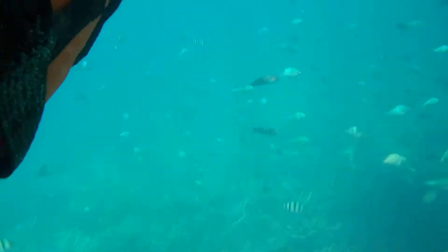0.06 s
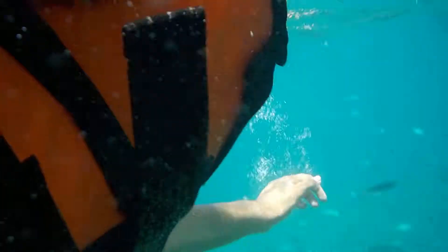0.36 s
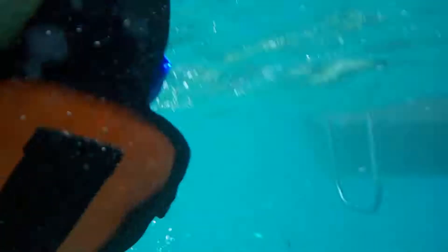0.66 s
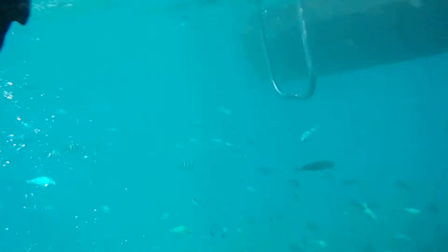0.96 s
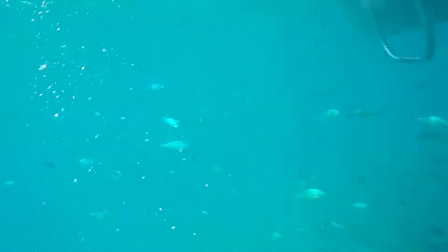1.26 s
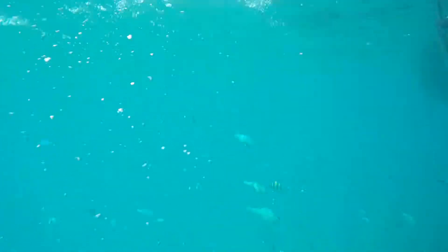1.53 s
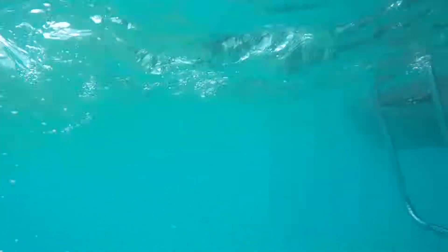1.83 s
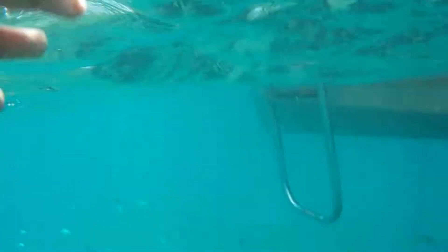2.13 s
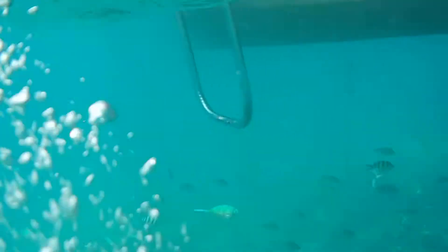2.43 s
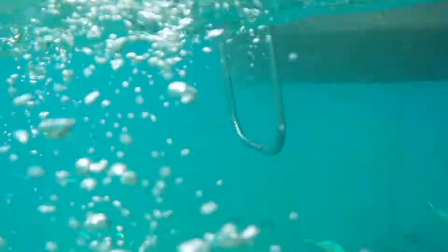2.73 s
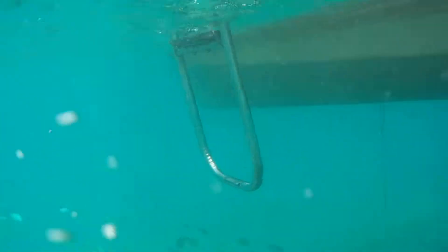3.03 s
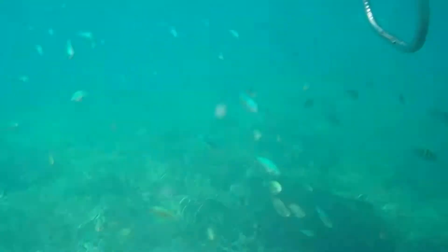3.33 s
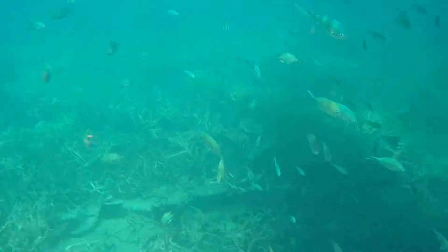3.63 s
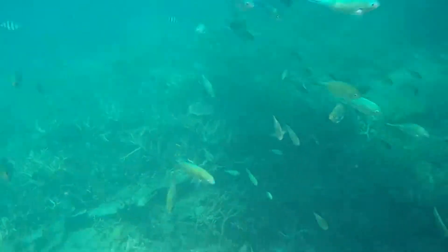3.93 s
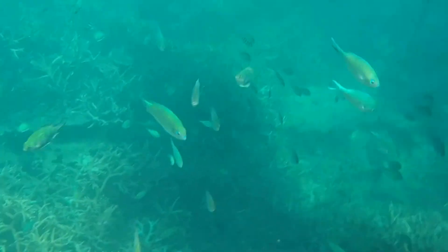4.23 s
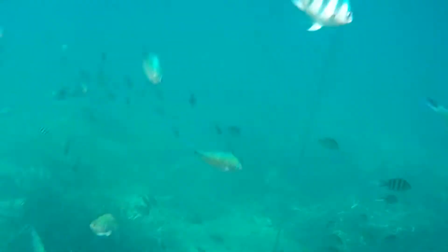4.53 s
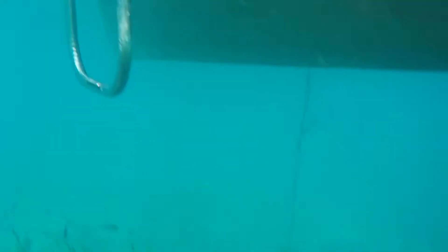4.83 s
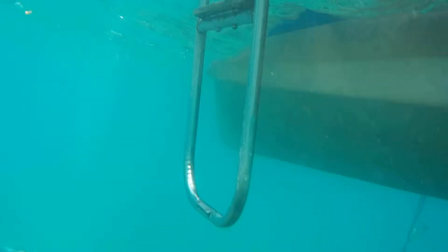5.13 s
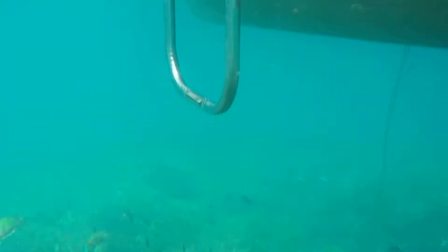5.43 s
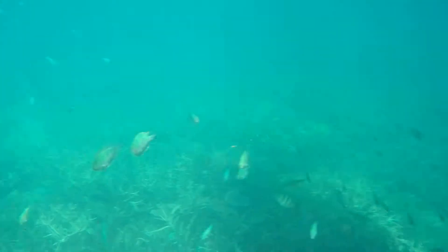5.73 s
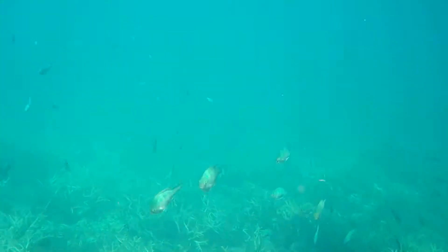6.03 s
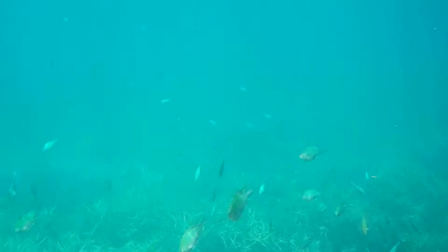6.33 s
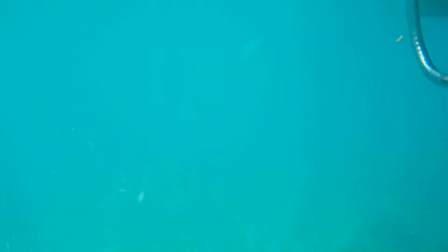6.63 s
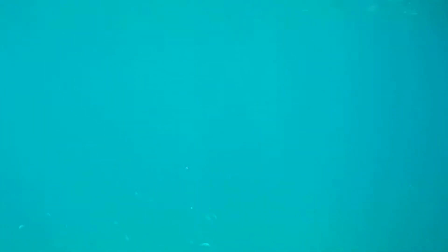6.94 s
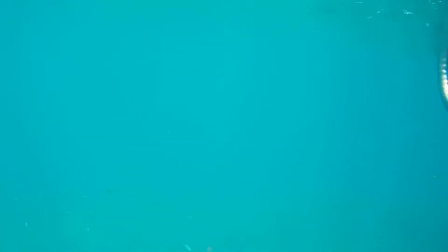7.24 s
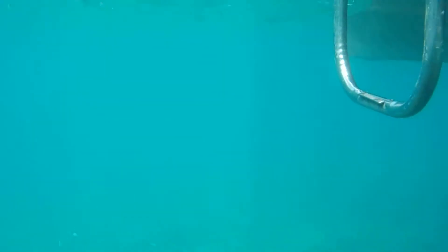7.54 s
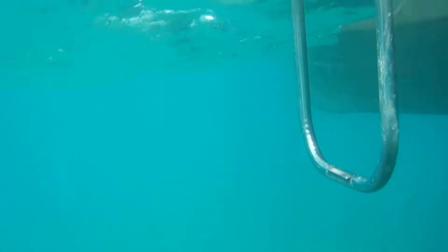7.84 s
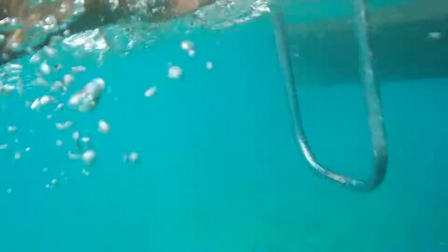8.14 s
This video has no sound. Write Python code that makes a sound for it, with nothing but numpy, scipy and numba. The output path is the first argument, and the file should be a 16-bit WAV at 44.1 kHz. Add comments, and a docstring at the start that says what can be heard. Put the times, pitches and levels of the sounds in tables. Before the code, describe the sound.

Muffled bubbling is heard just under the sea surface, through a stereo microphone in a swimmer's watertight case. In the first second the case knocks, squeaks briefly, creaks and crackles under a hand and life vest, while big bubbles gulp close by. Strokes push soft low rumbles past, and air gurgles and fizzes farther off. Another creak comes at about 1.8 seconds, then a loud burst of bubbles, rising in pitch, around 2.3. After a short lull the grip creaks and crackles again from 3.1 to 3.7. Looser gulps and short strings of plops follow until about 5.3, then things thin out, with knocks and loud plops near 6.2 and 6.5. From 7.5 seconds knocks, crackle and bubbles crowd in, building until the end just after 8. Throughout, tiny collapsing bubbles tick over a very faint hiss.

```python
"""Just under the sea surface near a boat, from a stereo microphone in a swimmer's watertight case.
At first the case knocks, and squeaks and creaks under a hand and a life vest; big bubbles gulp close by.
Strokes rumble past and shed air, which gurgles and fizzes farther off, with a burst at 2.3 s.
The grip crackles again after 3 s, looser gulps follow, and from 7.5 s knocks and bubbles crowd in.
Throughout, tiny collapsing bubbles tick in the water and the wall of the case muffles everything."""
import sys
import numpy as np
from scipy import signal
from scipy.fft import rfft, irfft
from scipy.io import wavfile
from scipy.ndimage import uniform_filter1d
from numba import njit

SR = 44100
rng = np.random.default_rng(int(sys.argv[2]) if len(sys.argv) > 2 else 0)


def wrap_up_sound(samples):
    """Save the sound to the file named by the first command line argument, as 16-bit audio."""
    columns = np.atleast_2d(samples).T
    # keep every value between -1 and 1, then stretch to whole-number steps
    tamed = np.clip(columns, -1, 1)
    steps = np.round(tamed * 32767).astype(np.int16)
    wavfile.write(sys.argv[1], SR, steps)


N = 360738
TIME = np.arange(N) / SR
CUTOFF_HZ = 14200

# air in the water around the swimmer: t/s, big bubbles/dB, middling bubbles/dB, fizz/dB
AIR_LEVELS = [(0.0, -26, -38, -59), (0.34, -38, -45, -59), (0.89, -36.5, -47, -64.5),
              (1.16, -44.5, -49.5, -66), (1.75, -31.5, -42.5, -57), (2.0, -36, -39, -63),
              (2.3, -23.5, -32.5, -52), (2.51, -39, -39, -56.5), (2.71, -46.5, -51.5, -65),
              (3.05, -47.5, -50, -66.5), (3.74, -34, -43, -62.5), (4.6, -33, -43.5, -62.5),
              (4.92, -28.5, -40, -59), (5.74, -42, -48, -62), (6.35, -33, -42.5, -57.5),
              (7.02, -38, -48.5, -66.5), (7.52, -35, -47.5, -62), (8.18, -21, -29, -56)]


def near_plops(pan_db=-0.9, pan_spread_db=3.0):
    """Plops and blips right by the microphone, mostly air that breaks off and rings, singly or in strings."""
    # close ringing plops and short pitched blips, mostly bubbles: t/s, f/Hz, level/dB, t60/s
    plops = [(0.025, 412, -24, 0.13), (0.071, 739, -11.5, 0.043), (0.336, 439, -16, 0.079),
             (0.534, 476, -7.5, 0.026), (0.548, 437, -15, 0.074), (0.595, 414, -7, 0.085),
             (0.636, 523, -16, 0.047), (0.642, 308, -8, 0.031), (0.656, 274.4, -20.5, 0.2),
             (0.708, 465, -13, 0.028), (0.796, 275, -17.5, 0.13), (0.842, 729, -24, 0.13),
             (0.882, 920, -17, 0.02), (0.868, 440, -0.5, 0.01), (0.889, 310, -12, 0.015),
             (1.554, 1740, -32, .041), (1.591, 326.6, -20, 0.065), (1.993, 708, -25, 0.21),
             (2.047, 293, -12, 0.11), (2.066, 496, -17.5, 0.16), (2.091, 337, -15.5, 0.081),
             (2.104, 990, -26, 0.085), (2.301, 376.5, -7, .11), (2.35, 414, 1.5, 0.037),
             (2.355, 1090, -8, 0.012), (2.367, 423, -12.5, .055), (2.546, 1105, -25.5, 0.069),
             (3.098, 1410, -23.5, 0.053), (3.4, 1712, -33.5, 0.038), (3.585, 316.8, -15, 0.47),
             (3.66, 895, -16.5, 0.047), (3.663, 304.7, -13.5, 0.24), (4.004, 358, -21.5, 0.079),
             (4.344, 313, -14.5, 0.13), (4.362, 834, -22, 0.031), (4.463, 320, -17.5, 0.076),
             (4.584, 308, -19, 0.13), (4.652, 332, -14.5, 0.054), (4.751, 458, -9.5, 0.1),
             (4.869, 462, -14, 0.11), (4.894, 313, -14, 0.069), (4.973, 301, -26, 0.49),
             (5.021, 321.4, -8.5, 0.13), (5.103, 298, -28.5, 0.32), (5.176, 895, -19.5, 0.05),
             (5.204, 593, -12.5, 0.026), (5.211, 367, -17.5, 0.06), (5.335, 940, -27, 0.031),
             (5.53, 920, -31, 0.035), (5.837, 984, -30.5, 0.07), (6.111, 721, -24.5, .14),
             (6.249, 299, -6.5, 0.051), (6.449, 307, -0.5, 0.032), (6.459, 810, -7, 0.013),
             (6.471, 291, -7.5, 0.1), (6.698, 890, -25, 0.047), (6.701, 326, -18.5, 0.064),
             (6.94, 840, -21.5, 0.03), (7.208, 1495, -29.5, 0.024), (7.551, 324, -11.5, 0.083),
             (7.617, 926, -20.5, 0.036), (7.644, 305, -9.5, 0.13), (7.675, 207.6, -22, 0.41),
             (7.68, 296.6, -18.5, 0.26), (7.922, 290, -13.5, 0.21), (7.773, 656, -16.5, 0.028),
             (7.78, 337, 0, 0.015), (7.918, 610, -7, .02), (7.995, 354, -9, 0.043),
             (7.965, 308, -0.5, 0.049), (8.011, 388, -4, 0.06), (8.081, 319, -3, 0.033),
             (8.11, 407, -18, 0.044), (8.153, 1560, -21, .039), (8.165, 460, -3, 0.019)]
    s, hz, level_db, t60 = np.transpose(plops + bubble_strings())
    side, lead = rng.standard_normal((len(s), 2)).T
    gains = from_db(level_db + 1.0) * panned(pan_db + pan_spread_db * side)
    return pulsate(s, hz, gains, t60, skew=0.1 * np.sign(lead), rise=0.063, swell_cycles=1.0)


def bubble_strings(per_s=27, t60=0.16, uneven_db=0.5):
    """Air pinches off evenly in ever smaller, higher bubbles; rows of t/s, f/Hz, level/dB, t60/s."""
    # strings of bubbles: first t/s, last t/s, first f/Hz, last f/Hz, first level/dB, last level/dB
    strings = [(2.197, 2.39, 283.8, 422.7, -12.5, -12.5), (3.943, 4.041, 341, 374, -19, -19),
               (4.214, 4.266, 377, 418, -22.5, -21), (7.716, 7.844, 319.5, 442, -20.5, -28.5)]
    rows = []
    for first_s, last_s, first_hz, last_hz, first_db, last_db in strings:
        count = 1 + round((last_s - first_s) * per_s)
        s = np.linspace(first_s, last_s, count)
        hz = np.geomspace(first_hz, last_hz, count)
        level_db = np.linspace(first_db, last_db, count) + uneven_db * rng.standard_normal(count)
        rows += zip(s, hz, level_db, [t60] * count)
    return rows


def stray_bubbles(uneven_db=6.5, pan_spread_db=1.5):
    """Now and then a bubble plops nearer than the crowd, louder where the water holds more air."""
    # size classes: lowest f/Hz, highest f/Hz, rate/(1/s), level over the middling bubbles/dB, t60/s
    strays = [(275, 360, 3, 5.5, 0.14), (630, 1150, 6.1, 13, 0.062), (1438, 1900, 4, 4.5, 0.067)]
    air_s, _, middling_db, _ = np.transpose(AIR_LEVELS)
    out = np.zeros((2, N))
    for low_hz, high_hz, per_s, over_db, t60 in strays:
        s = np.cumsum(rng.gamma(2, 1 / (2 * per_s), size=100))
        place, size, side, skew = rng.uniform(-1, 1, (len(s), 4)).T
        hz = low_hz * (high_hz / low_hz) ** ((place + 1) / 2)
        level_db = np.interp(s, air_s, middling_db) + over_db + uneven_db * size
        gains = from_db(level_db) * panned(pan_spread_db * side)
        out += pulsate(s, hz, gains, np.full(len(s), t60), 0.31 * skew, rise=0.06, swell_cycles=5.4)
    return out


def gurgle(puff_db=2.5, puff_hz=9, small_follows=0.38):
    """Farther off, clouds of bubbles from gulps down to fizz swell with the air in the water."""
    # tiny bubbles drifting past: t/s, length/s, small-bubble lift/dB, fizz lift/dB (none if negative)
    flurries = [(1.24, 0.031, 6, 4), (1.375, 0.087, 9.5, 6), (2.223, 0.27, 3, 3), (2.511, .2, 5, 3.5),
                (3.67, 0.18, 8.5, 6.5), (5.76, 0.3, 6.5, 3.5), (6.376, 0.075, 4.5, 2.5),
                (6.56, 0.25, 7.5, -3.5), (7.458, 0.057, 10.5, 10), (7.85, 0.071, 10.5, 5.5),
                (8.156, 0.058, 11, -5)]
    # spectrum of the big bubbles: f/Hz, level/dB
    big_spectrum = [(200, -18), (260, -8.5), (305, 2), (360, -3), (470, -0.5), (560, -7.5), (700, -24.5)]
    # spectrum of the middling bubbles: f/Hz, level/dB
    middling_spectrum = [(450, -19), (600, -5.5), (700, 1.5), (900, 1), (1100, -2.5), (1300, -9),
                         (1800, -23.5)]
    air_s, *columns = np.transpose(AIR_LEVELS)
    air_db = np.array([np.interp(TIME, air_s, db) for db in columns])
    big_db, middling_db, fizz_db = air_db + puff_db * drift(puff_hz)[0]
    starts, lengths, *lifts_db = np.transpose(flurries)
    small_lift, fizz_lift = [swells(starts, lengths, db, rest_db=0, rise_db_per_s=199, fall_db_per_s=132)
                             for db in lifts_db]
    # small bubbles follow their neighbours in size
    small_db = small_follows * middling_db + (1 - small_follows) * fizz_db + small_lift
    big = cloud(253.3, 550.7, count=1800, cycles=18.7, spread_db=4.5, width=0.3, rise=0.069)
    middling = cloud(560, 1300, count=5000, cycles=33.3, spread_db=4.5, width=0.4, rise=0.055)
    small = cloud(1300, 2083, count=4000, cycles=31, spread_db=4.5, width=1.0, rise=0.035)
    fizz = cloud(2600, 6200, count=22000, cycles=35, spread_db=8.5, width=1.64, rise=0.033)
    finest = cloud(7670, 8560, count=9000, cycles=140, spread_db=8.5, width=0.73, rise=0.03)
    return (from_db(big_db - 1.0) * rms_one(coloured(big, big_spectrum))
            + from_db(middling_db - 0.55) * rms_one(coloured(middling, middling_spectrum))
            + from_db(small_db - 2.0) * small
            + from_db(fizz_db + fizz_lift + 1.5) * (fizz + from_db(-4.0) * finest))


def cloud(low_hz, high_hz, count, cycles, spread_db, width, rise):
    """Bubbles of random size born at random moments; the crowd keeps a steady rms of 1."""
    when, place = rng.random((count, 2)).T
    size, life, side, skew = np.clip(rng.standard_normal((count, 4)).T, -2.2, 2.2)
    hz = low_hz * (high_hz / low_hz) ** place
    gains = from_db(spread_db * size) * panned(4 * width * side)
    t60 = cycles / hz * np.exp(0.8 * life)
    crowd = pulsate(when * N / SR, hz, gains, t60, width * skew, rise, swell_cycles=0.15)
    power = uniform_filter1d(np.mean(crowd ** 2, axis=0), size=5000)
    return crowd / np.sqrt(power + 1e-9)


@njit
def pulsate(s, hz, gains, t60, skew, rise, swell_cycles):
    """Each bubble or blip swells, rings and dies as its pitch climbs by the fraction `rise`."""
    out = np.zeros((2, N))
    for k in range(len(s)):
        start, length = max(int(s[k] * SR), 0), int(t60[k] * SR) + 1
        w = 2 * np.pi * hz[k] / SR
        step = np.exp(-6.9 / length + 1j * w * (1 - rise / 7))
        climb = np.exp(1j * w * rise / length)
        turn = np.exp(1j * skew[k])  # phase between left and right
        opening = np.exp(-hz[k] / (swell_cycles * SR))
        wave, closed = 1 + 0j, 1.
        for i in range(start, min(start + length, N)):
            out[0, i] += gains[0, k] * (1 - closed) * wave.imag
            out[1, i] += gains[1, k] * (1 - closed) * (wave * turn).imag
            wave *= step
            step *= climb
            closed *= opening
    return out


def knocks(uneven_db=4.5, rebound_s=0.002742, rebound_db=-6.5, soft_hz=2300):
    """Each knock or jerk rings the case and catches once more; hard ones favour the high modes."""
    # short knocks and clicks on the case, many of them sounding with loud bubbles:
    # t/s, level/dB, left-right/dB, brightness/(dB per decade)
    case_knocks = [(0.2101, -18, -4, 36), (0.2404, -12, 4, 27), (0.3546, -19.5, 8.5, 18),
                   (0.4498, -22, -22, -12), (0.5336, -12.5, -4.5, 14), (0.638, -12.5, -1, -2),
                   (0.6604, -16.5, 2, 1), (0.8887, -19.5, 3, -22), (3.3535, -21.5, -2, 1),
                   (3.4208, -37, 22, -2), (3.5117, -22, 13, -15), (3.664, -16.5, -10, -18.5),
                   (4.8666, -26, -11.5, -3), (4.9013, -24, -4, -12), (6.249, -14.5, -2, -1),
                   (6.4597, -22, -5, -13), (7.4004, -31.5, -31, -26), (7.5549, -16, 0.5, -8),
                   (7.6473, -12.5, 3, -8), (7.6726, -17.5, 0.5, -20), (7.922, -13, 9, -8),
                   (7.9673, -15.5, 5, -13)]
    # modes of the case around the microphone: f/Hz, level/dB, t60/s
    case_modes = [(305.5, -2, 0.05), (396, -16.5, 0.087), (537, -4, 0.028), (661, -15, 0.032),
                  (913, -6.5, 0.03), (1170, -14, 0.01), (1353, -11, 0.0067), (1572, -15.5, 0.033),
                  (3790, -22, 0.014), (4550, -22, 0.023), (10300, -21.5, 0.0015)]
    s, level_db, pan_db, bright_db = np.transpose(case_knocks + creak_jerks())
    chance = rng.standard_normal((len(s), len(case_modes))).T
    out = np.zeros((2, N))
    for k, (hz, mode_db, t60) in enumerate(case_modes):
        strength_db = level_db + 0.5 + mode_db + bright_db * np.log10(hz / 900) + uneven_db * chance[k]
        clicks = np.zeros((2, N))
        clicks[:, (s * SR).astype(int)] = from_db(strength_db) * panned(pan_db)
        clicks += from_db(rebound_db) * np.roll(clicks, int(rebound_s * SR), axis=1)
        clicks[k % 2] = np.roll(clicks[k % 2], 5)  # modes reach the two microphone ports out of step
        out += ring(clicks, hz, t60)
    cushion = signal.butter(2, soft_hz, fs=SR, output="sos")  # soft contact dulls the treble
    return high_passed(signal.sosfilt(cushion, out), 360, order=2)


def creak_jerks(jitter_s=0.00032, uneven_db=0.2, pan_spread_db=17.5):
    """A creak sticks and slips at a nearly even rate; rows like case_knocks in knocks()."""
    # creaks: first t/s, last t/s, jerk rate/(1/s), level/dB, left-right/dB, brightness/(dB per decade)
    creaks = [(0.5946, 0.6061, 150, -9, 6, 9.5), (0.6917, 0.7084, 106, -18, 8, -6),
              (0.9361, 0.9597, 130, -9, -13, 8), (0.967, 0.9905, 84, -19, -14, -3.5),
              (1.0096, 1.0835, 101, -13, -10.5, 4), (1.758, 1.8027, 107, -12.5, -10, 7.5),
              (1.8172, 1.8829, 88, -13.5, -15, 3), (3.1005, 3.1184, 172, -14, 13.5, -2),
              (3.2401, 3.2808, 109, -19.5, -19, -5)]
    rows = []
    for first_s, last_s, per_s, level_db, pan_db, bright_db in creaks:
        count = 1 + round((last_s - first_s) * per_s)
        late, weak, side = rng.standard_normal((count, 3)).T
        s = np.linspace(first_s, last_s, count) + jitter_s * late
        rows += zip(s, level_db - uneven_db * weak, pan_db + pan_spread_db * side, [bright_db] * count)
    return rows


def squeaks(db_per_octave=-6.0, rasp=0.049):
    """Wet skin slips on the case fast enough to make a short gliding tone with raspy overtones."""
    # fast slips: t/s, length/s, start f/Hz, end f/Hz, level/dB, left-right/dB
    slips = [(0.206, 0.036, 387.3, 407, -16.5, -7), (.240, 0.028, 660, 678, -22.5, 2.5),
             (0.254, 0.022, 768, 1490, -28.5, -7), (0.419, 0.019, 1940, 1000, -31, 9)]
    out = np.zeros((2, N))
    waver = 1 + rasp * drift(600)[0]
    for s, length, start_hz, end_hz, level_db, pan_db in slips:
        start, size = int(s * SR), int(length * SR)
        hz = np.geomspace(start_hz, end_hz, size) * waver[start:start + size]
        phase = 2 * np.pi * np.cumsum(hz) / SR
        tone = sum(from_db(db_per_octave * np.log2(k)) * np.sin(k * phase)
                   for k in range(1, 32) if k * end_hz < CUTOFF_HZ)
        tone *= signal.windows.tukey(size, 0.2)
        out[:, start:start + size] += np.outer(from_db(level_db) * panned(pan_db), tone)
    return coloured(out, [(1700, 3.5), (3200, -7.5), (6500, -13.5), (10000, -24)])


def crackle(mean_gap_s=0.0035, uneven_db=8.5):
    """The grip creeps over the case in tiny slips, each a dry click right at the microphone."""
    # shifts of the grip: start t/s, end t/s, level/dB
    grips = [(0.439, 0.573, -16.5), (0.595, .70, -15), (0.694, 0.815, -25.5), (0.903, 1.084, -21.5),
             (1.729, 1.9, -21), (3.103, 3.134, -16.5), (3.227, 3.699, -21.5), (6.446, 6.488, -16.5),
             (7.243, 7.423, -29), (7.623, 7.693, -19), (7.918, 8.143, -18)]
    # spectrum of one slip: f/Hz, level/dB
    slip_spectrum = [(100, -2.5), (600, 16), (2000, -9.5), (4000, -19.5), (7000, -19.5), (12000, -21.5)]
    s = np.cumsum(rng.gamma(4, mean_gap_s / 4, 4000))
    signs = rng.choice([-1, 1], (2, len(s)))
    sizes = signs * from_db(uneven_db * np.minimum(rng.standard_normal(len(s)), 1.6))
    clicks = np.zeros((2, N))
    for start, end, level_db in grips:
        slipping = (s > start) & (s < end)
        clicks[:, (s[slipping] * SR).astype(int)] = from_db(level_db) * sizes[:, slipping]
    return coloured(clicks, slip_spectrum)


def flow(lumpy_db=4.0, lump_hz=35, shared=0.85):
    """With each stroke eddies press in lumps on the two microphone ports, only partly alike."""
    # water sweeping over the case: t/s, length/s, level/dB
    sweeps = [(0.0, .04, -49), (0.441, .08, -39), (0.6, .35, -45.5), (1.158, .28, -45), (1.647, .02, -56),
              (1.992, 0.085, -41), (2.864, .05, -44), (3.094, .03, -49.5), (3.256, 0.32, -42),
              (3.6, 0.12, -56), (4.14, .4, -55), (4.625, 0.019, -47), (4.865, 0.028, -40),
              (5.458, .02, -61), (6.24, .02, -69), (6.46, .2, -57), (7.246, .15, -45), (7.554, .12, -71),
              (7.87, .04, -45.5), (8.064, 0.032, -40.5)]
    # spectrum of the eddies: f/Hz, level/dB
    rumble_spectrum = [(15, -32), (35, -13.5), (60, -7.5), (120, -1.5), (190, 2), (300, 4.5), (600, -26),
                       (1500, -58)]
    flow_db = swells(*np.transpose(sweeps), rest_db=-69, rise_db_per_s=258.5, fall_db_per_s=103)
    eddies = rng.standard_normal((2, N)) + shared * rng.standard_normal(N)
    eddies *= from_db(lumpy_db * drift(lump_hz))
    return from_db(flow_db + 7.0) * rms_one(coloured(eddies, rumble_spectrum))


def ticks(t60=0.004, echo_s=0.0012, echo_db=-3.5):
    """Tiny collapses: a dry snap of a few cycles, smeared by echoes off the surface and the swimmer."""
    # the sharpest collapses: t/s, level/dB, f/Hz
    snaps = [(0.2003, -33, 3830), (0.4468, -29, 3780), (0.5325, -37.5, 5700), (1.586, -44.5, 4100),
             (1.9612, -45, 5830), (2.0738, -42, 3960), (2.2763, -37, 5740), (3.1068, -40.5, 3500),
             (3.6074, -41.5, 3040), (3.8388, -39, 3270), (4.2046, -41, 5000), (4.376, -46, 3860),
             (4.411, -41.5, 4460), (4.7605, -44, 3950), (5.078, -40.5, 3280), (5.528, -46, 4170),
             (5.879, -41.5, 4570), (5.9986, -41, 5300), (6.29, -42.5, 4430), (6.3696, -42, 4300),
             (6.4348, -43, 3870), (6.9, -41, 4500), (7.2494, -45, 5540), (7.521, -42, 4460)]
    s, level_db, hz = np.transpose(snaps + faint_ticks())
    gains = from_db(level_db + 11.5) * panned(4 * rng.standard_normal(len(s)))
    out = np.zeros((2, N))
    for k in range(4):  # the direct path, then three echoes
        late, skew, detune = rng.standard_normal((len(s), 3)).T
        arrival = s + k * echo_s * np.exp(0.23 * late)
        out += pulsate(arrival, hz * np.exp(0.14 * detune), gains * from_db(k * echo_db),
                       np.full(len(s), t60), 0.84 * skew, rise=0., swell_cycles=0.083)
    return out


def faint_ticks(count=12, uneven_db=2.0, centre_hz=4200, pitch_spread=0.25):
    """Fainter collapses at random moments, their level following the fizz; rows of t/s, level/dB, f/Hz."""
    when, size, place = rng.uniform(-1, 1, (count, 3)).T
    s = TIME[-1] * (when + 1) / 2
    air_s, _, _, fizz_db = np.transpose(AIR_LEVELS)
    level_db = np.interp(s, air_s, fizz_db) + 16 + uneven_db * size
    return list(zip(s, level_db, centre_hz * np.exp(pitch_spread * place)))


def hiss():
    """A faint, steady, bright hiss lies behind everything."""
    # spectrum of the hiss: f/Hz, level/dB
    hiss_spectrum = [(500, -5.5), (3000, -7), (6000, -7.5), (9000, 10), (13000, 15)]
    return from_db(-65.5) * rms_one(coloured(rng.standard_normal((2, N)), hiss_spectrum))


def swells(starts, lengths, tops_db, rest_db, rise_db_per_s, fall_db_per_s):
    """Level curve in dB: each event climbs from rest, holds and sinks back."""
    curve = np.full(N, float(rest_db))
    for start, length, top_db in zip(starts, lengths, tops_db):
        before, after = np.maximum(start - TIME, 0), np.maximum(TIME - start - length, 0)
        curve = np.maximum(curve, top_db - rise_db_per_s * before - fall_db_per_s * after)
    return curve


def drift(hz, hop=40):
    """Smooth random wander of rms 1, mostly slower than `hz`, separate in each channel."""
    r = np.exp(-2 * np.pi * hz * hop / SR)
    noise = rng.standard_normal((2, N // hop + 2002))
    slow = signal.lfilter([1], [1, -2 * r, r * r], noise)[:, 2000:]
    return np.array([np.interp(np.arange(N) / hop, np.arange(len(s)), rms_one(s)) for s in slow])


def ring(clicks, hz, t60):
    """A unit click sets a sine of height 1 ringing."""
    r, w = from_db(-60 / (t60 * SR)), 2 * np.pi * hz / SR
    return signal.lfilter([0, np.sin(w)], [1, -2 * r * np.cos(w), r * r], clicks + 1e-18)


def coloured(x, spectrum, size=8192):
    """Causal (minimum-phase) filter from rows of f/Hz, level/dB."""
    hz, db = np.transpose(spectrum)
    grid = np.maximum(np.arange(size // 2 + 1) * SR / size, 1)
    gain = from_db(np.interp(np.log(grid), np.log(hz), db))
    cepstrum = irfft(np.log(gain))
    cepstrum[1:size // 2] *= 2
    cepstrum[size // 2 + 1:] = 0
    impulse = irfft(np.exp(rfft(cepstrum)))
    return signal.oaconvolve(x, impulse[None], axes=1)[:, :N]


def high_passed(x, hz, order):
    """Cut the bass."""
    return signal.sosfilt(signal.butter(order, hz, "high", fs=SR, output="sos"), x)


def panned(pan_db):
    """Left and right gains of mean power 1."""
    sides = from_db(np.multiply.outer([1, -1], pan_db) / 2)
    return sides / np.sqrt(np.mean(sides ** 2, axis=0))


def from_db(db):
    """Decibels to gain."""
    return 10 ** (np.asarray(db) / 20)


def rms_one(x):
    """Scale to unit rms."""
    return x / np.sqrt(np.mean(x ** 2) + 1e-20)


def scene():
    """Everything that reaches the case, over a faint hiss."""
    background = hiss()
    bubbling = gurgle() * panned([-0.7]) + near_plops() + stray_bubbles()
    on_case = knocks() + squeaks() + crackle()
    return high_passed(bubbling, 200, order=2) + on_case + flow() + ticks() + background


def record(dry, overload=0.6):
    """At the microphone: loud peaks are rounded and the case wall cuts deep notches in the treble."""
    # response of the case wall: f/Hz, level/dB
    wall_response = [(1700, 1.5), (2050, -7), (2280, -16.5), (2430, -33), (2720, -10.5), (3000, -21.5),
                     (3300, -0.5), (6000, -1.5), (7200, -8), (8150, -38), (9000, -6.5), (11000, 3),
                     (12300, -8.5), (13500, -23)]
    rounded = overload * np.tanh(dry / overload)
    muffled = high_passed(coloured(rounded, wall_response), 84, order=1)
    return signal.sosfilt(signal.cheby2(12, 60, CUTOFF_HZ, fs=SR, output="sos"), muffled)


dry = scene()
out = record(dry)
wrap_up_sound(out)
```